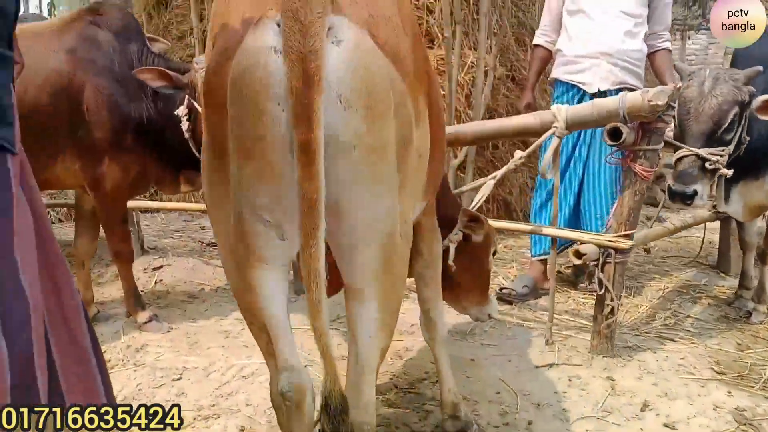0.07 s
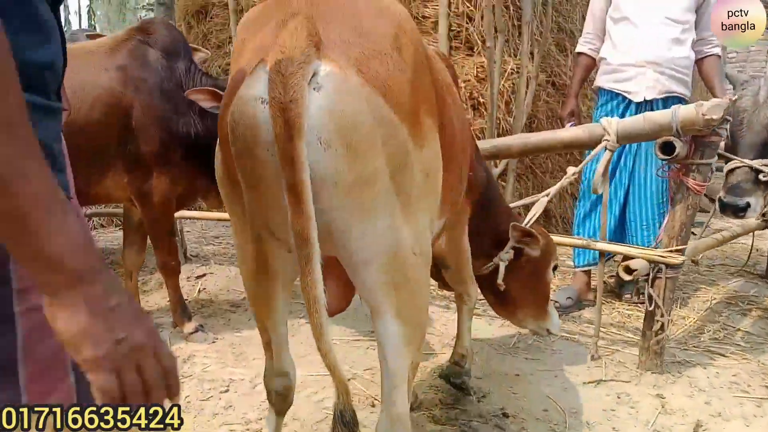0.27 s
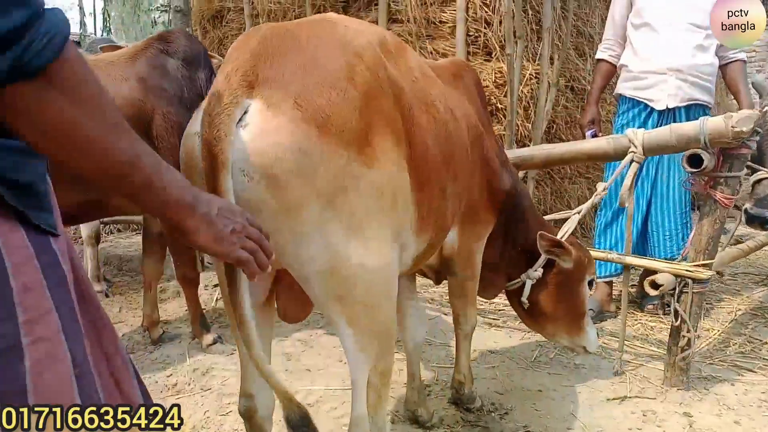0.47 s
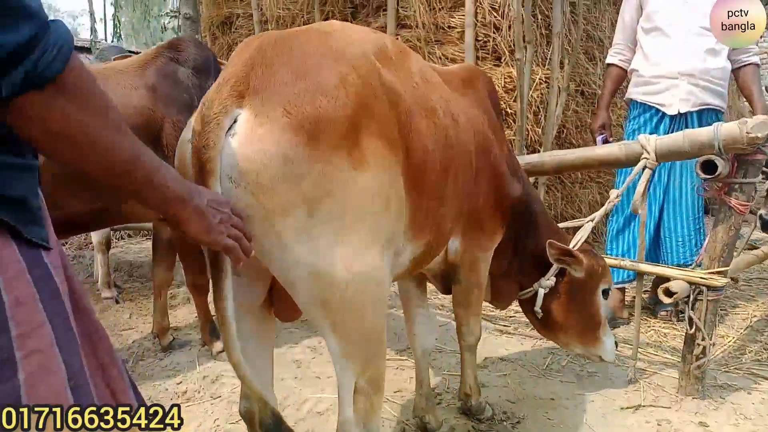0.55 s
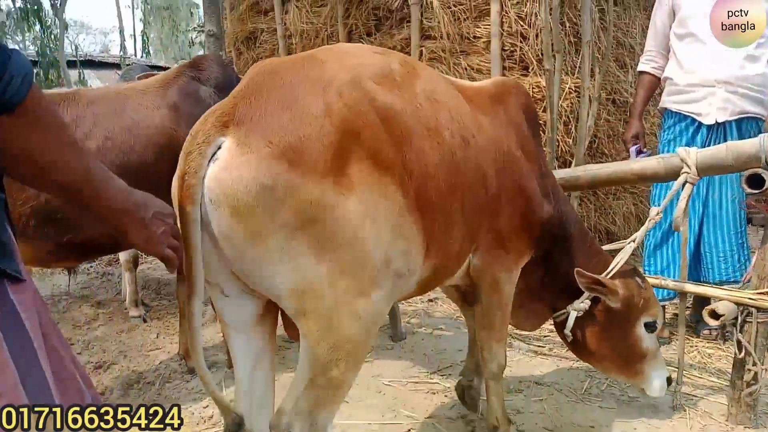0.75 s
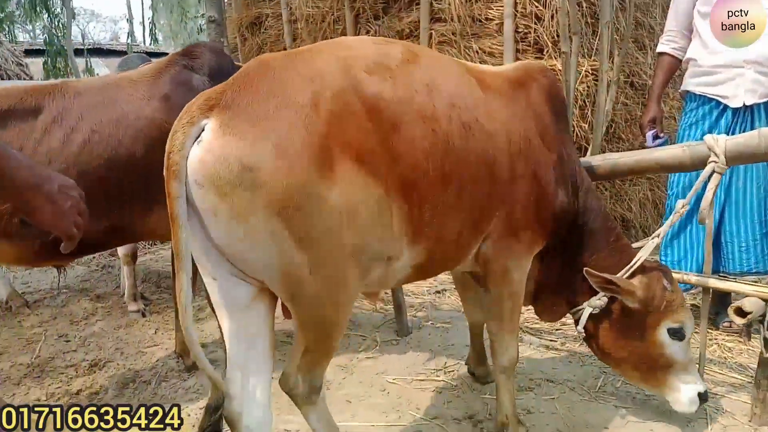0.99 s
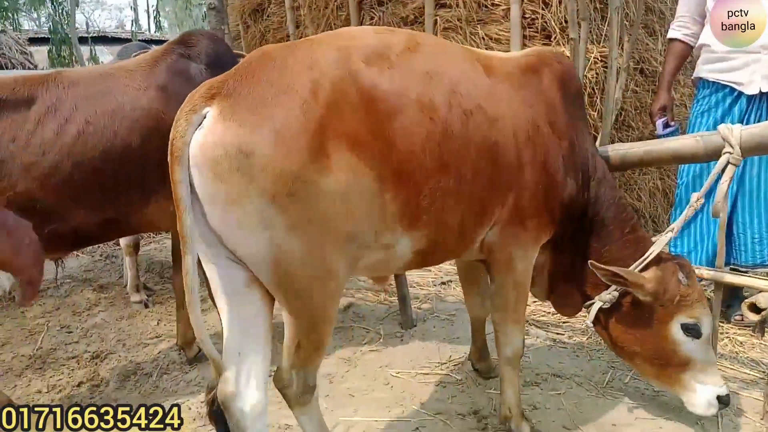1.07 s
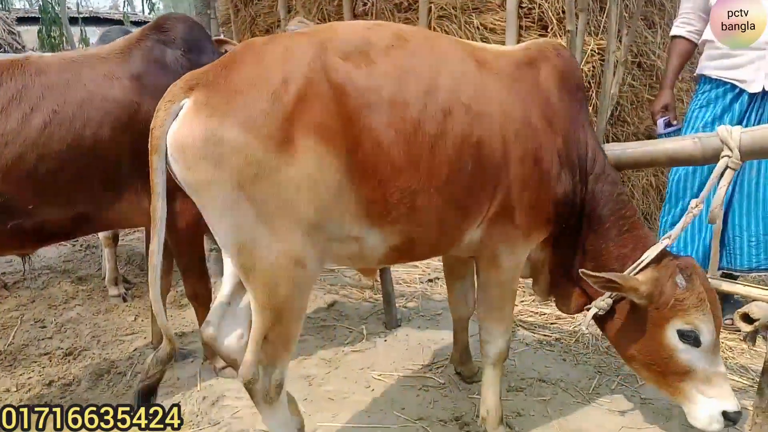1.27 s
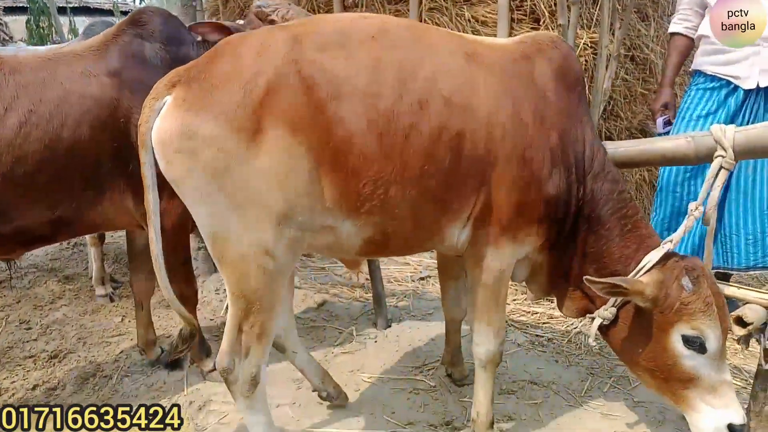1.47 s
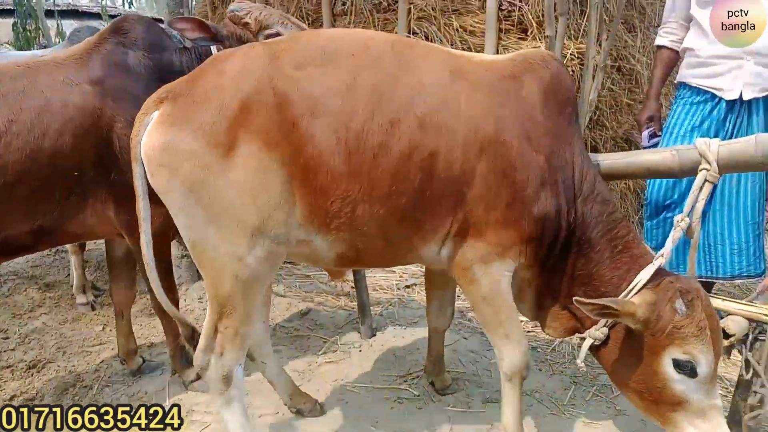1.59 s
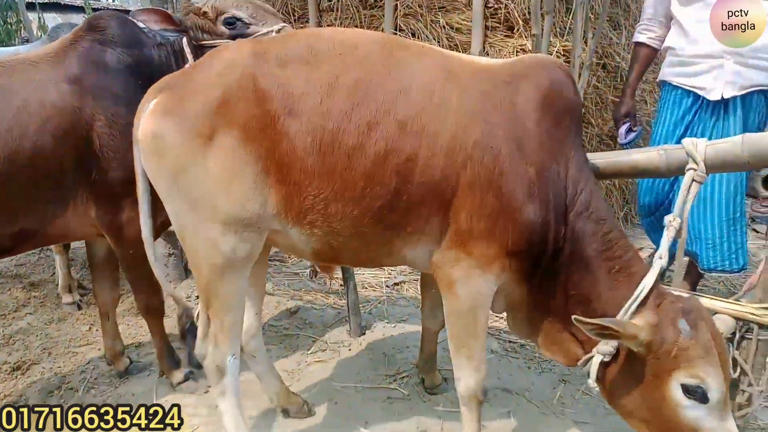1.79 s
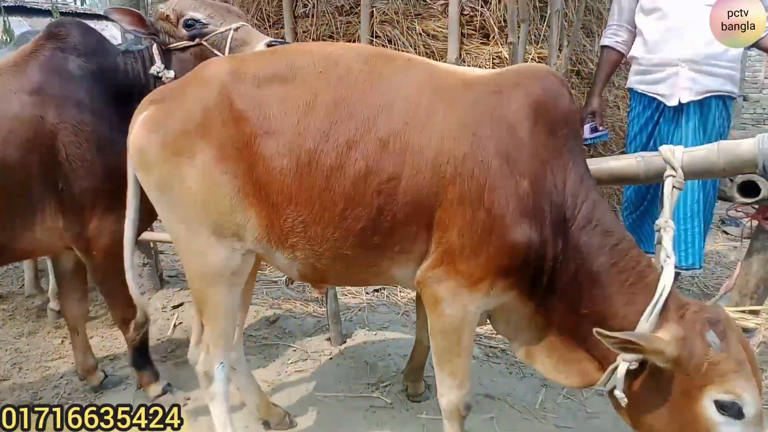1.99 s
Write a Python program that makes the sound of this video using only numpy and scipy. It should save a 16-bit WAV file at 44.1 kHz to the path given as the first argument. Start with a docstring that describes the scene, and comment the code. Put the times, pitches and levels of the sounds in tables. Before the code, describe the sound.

A bull gives a short low moo after crisp scuffing through sand and straw outdoors

```python
"""A bull grunts softly in an outdoor cattle yard, then feet scuff through sand and dry straw nearby.
Cattle further off give a thin, rattling call, and the bull answers the ear with a short low moo.
Straw snaps, small birds chirp faintly, and the microphone is very bright at the top.
Voices are pulses and breath ringing a throat, or plain low tones; sand, straw and air are shaped noise;
birds and a bamboo knock are sines. Near sounds are almost dry, far ones carry more of the yard."""
import sys
import numpy as np
from scipy import signal
from scipy.fft import rfft, irfft
from scipy.io import wavfile
from scipy.ndimage import uniform_filter1d

SR = 44100
rng = np.random.default_rng(int(sys.argv[2]) if len(sys.argv) > 2 else 0)


def master(y):
    """Save y as 16-bit WAV."""
    cut = np.clip(np.atleast_2d(y).T, -1, 1)
    pcm = np.round(cut * 32767)  # scale
    wavfile.write(sys.argv[1], SR, pcm.astype(np.int16))


N = 90404
T = np.arange(N) / SR  # time [s]

# spectrum of snapping straw: (frequency [Hz], relative level [dB])
SNAP_SPECTRUM = [(100, -57), (700, -44), (2000, -15), (5000, -16.5), (6500, -7), (8300, -26), (11000, -9.5),
                 (13500, 8), (15200, 13), (16000, -3), (17000, -79)]
SNAP_DECAY_S = .0011


def amp(db):
    """Decibels to gain."""
    return 10 ** (np.asarray(db) / 20)


def unit(x):
    """Scales to rms 1."""
    return x / np.sqrt(np.mean(x ** 2) + 1e-20)


def colour(x, points):
    """Filters by a spectrum of (frequency [Hz], level [dB]) points, joined along log frequency."""
    hz, db = np.transpose(points)
    padded = 2 * len(x)
    f = np.fft.rfftfreq(padded, 1 / SR)
    gain = amp(np.interp(np.log(f + 1), np.log(hz + 1), db))
    return irfft(rfft(x, padded) * gain)[:len(x)]


def wander(size):
    """Smooth random curve of rms 1; size [samples] sets how slowly it moves."""
    once = uniform_filter1d(rng.standard_normal(N), size)
    return unit(uniform_filter1d(once, size))


def level(s, db):
    """Gain along a dB curve, silent outside it, with its steps smoothed."""
    inside = (T >= s[0]) * (T <= s[-1])
    return uniform_filter1d(amp(np.interp(T, s, db)) * inside, size=200)


def phase(hz):
    """Running phase [rad] of a pitch curve [Hz]."""
    return 2 * np.pi * np.cumsum(hz) / SR


def bump(middle, half):
    """Bell-shaped swell, down to 1/e at half [s] from its middle [s]."""
    return np.exp(-((T - middle) / half) ** 2)


def resonate(x, hz, width):
    """A steep resonance that follows a pitch curve: shift to 0 Hz, low-pass twice, shift back."""
    turn = np.exp(1j * phase(hz * np.ones(N)))
    r = np.exp(-np.pi * width / SR)
    smooth = signal.lfilter([(1 - r) ** 2], [1, -2 * r, r * r], x / turn + 1e-18)
    return (turn * smooth).real


def ring(x, modes, factor=1):
    """Sums parallel resonances (frequency [Hz], width [Hz], level [dB]), pitched by a factor."""
    return unit(sum(amp(db) * unit(resonate(x, hz * factor, width)) for hz, width, db in modes))


def voice(turns, throat, rough, mouth=1):
    """Fold pulses and a puff of air in each cycle ring the throat."""
    folds = np.diff(np.floor(turns), prepend=0)
    puffs = np.exp(-2 * (turns % 1)) * rng.standard_normal(N)
    drive = (1 - rough) * unit(folds) + rough * unit(puffs)
    return ring(drive, throat, mouth)


def grit():
    """Dense grains of uneven size over a smooth hiss, in shifting patches of colour."""
    grains_per_s, spread_db, smooth_share, patchy_db = 3600, 2, 0.44, 1.2
    sizes = amp(spread_db * np.minimum(rng.exponential(1, N), 4)) * rng.choice([-1, 1], N)
    grains = unit(sizes * (rng.random(N) < grains_per_s / SR))
    mix = (1 - smooth_share) * grains + smooth_share * rng.standard_normal(N)
    z = signal.stft(mix, nperseg=512)[2]
    patches = uniform_filter1d(rng.standard_normal(z.shape), size=4, axis=0)  # across frequency
    patches = unit(uniform_filter1d(patches, size=12, axis=1))  # along time
    return signal.istft(z * amp(patchy_db * patches), nperseg=512)[1][:N]


def yard(x):
    """A short scatter from the ground, fence and straw stacks: sparse, decaying random echoes."""
    t60_s, first_echo_s = 0.22, .006
    t = T[:SR // 2]
    sparse = (rng.random(len(t)) < .05) * (t > first_echo_s)
    taps = rng.standard_normal(len(t)) * sparse * amp(-60 * t / t60_s)
    return signal.fftconvolve(x, taps / np.linalg.norm(taps))[:N]


def yard_air():
    """Smooth noise of the open yard, shaped by a spectrum and a slow level curve."""
    air_db = -49
    # spectrum of the air: (frequency [Hz], relative level [dB])
    air_spectrum = [(15, -53), (25, -25), (43, -22), (98, -18), (203, -22.5), (252, -29.5), (304, -26),
                    (967, -28), (1790, -22.5), (2220, -19.5), (4850, -24.5), (6180, -17), (8080, -31),
                    (8760, -31.5), (11800, -12.5), (13500, -14), (15400, 3.5)]
    # course of the air: (time [s], level relative to air_db [dB])
    air_curve = [(0, 1), (.2, 4), (.7, 5), (2.001, 4), (2.06, -1)]
    air = unit(colour(rng.standard_normal(N), air_spectrum))
    return amp(air_db) * level(*np.transpose(air_curve)) * air


def cloth():
    """The hiss of cloth sliding early on: fine grit through a bright spectrum."""
    # course of the slide: (time [s], level [dB])
    cloth_curve = [(0, -59.5), (.08, -63.5), (.17, -61.5), (0.217, -57), (0.229, -44.5), (0.271, -45.5),
                   (.33, -47.5), (0.449, -45)]
    # spectrum of the cloth: (frequency [Hz], relative level [dB])
    cloth_spectrum = [(100, -50), (1200, -31), (2000, -17.5), (5000, -10.5), (6200, 4), (7300, 0.5),
                      (8300, -7.5), (12000, -6.5), (16000, -17)]
    return level(*np.transpose(cloth_curve)) * unit(colour(grit(), cloth_spectrum))


def birds():
    """Short, wavering, nearly pure glides."""
    waver = .012  # share of the pitch
    # chirps: (middle [s], half length [s], pitch at the middle [Hz], glide [Hz/s], level [dB])
    chirps = [(0.038, 0.053, 3820, -7000, -73), (1.068, 0.019, 4360, -4000, -71.5),
              (1.282, 0.018, 3250, 495.5, -63), (1.44, 0.0054, 2970, -3000, -66),
              (1.482, 0.032, 2648, -1200, -66.5), (1.543, 0.011, 2244, -3.5, -60),
              (1.716, 0.03, 2774, -2000, -66), (1.883, 0.004, 2740, -12, -65.5),
              (2.048, .014, 4090, 1000, -65.5)]
    out = np.zeros(N)
    for s, half, hz, glide, db in chirps:
        pitch = (hz + glide * (T - s)) * (1 + waver * wander(size=100))
        out += amp(db) * bump(s, half) * np.sqrt(2) * np.sin(phase(pitch))
    return out


def knock():
    """A bamboo rail is bumped softly and its modes ring briefly."""
    start_s, rise_s, knock_db = 1.16, 0.0016, -61
    # modes of the bamboo: (frequency [Hz], level relative to knock_db [dB], t60 [s])
    modes = [(706, 2, 0.039), (988, -1, 0.094), (1250, 1.5, 0.045), (2090, -1.5, .04)]
    t = np.maximum(T - start_s, 0)
    tones = sum(amp(knock_db + db - 60 * t / t60) * np.sin(2 * np.pi * hz * t) for hz, db, t60 in modes)
    return np.minimum(t / rise_s, 1) * tones


def far_call():
    """Uneven rattling pulses through a nasal throat, with a weak chest tone and a thin falling line."""
    rough, jitter, chest_db = 0.24, .09, -16  # breath share, pitch share, level relative to the call
    # the call: (time [s], pulse rate [Hz], level [dB], mouth opening [factor on the resonances])
    call_curve = [(1.179, 79.7, -76, 1), (1.23, 92.25, -61, 0.99), (1.279, 100, -59.5, 0.97),
                  (1.33, 72.2, -59.5, 1), (1.398, 75.26, -60, 1.0), (1.469, 71.34, -63, 0.96),
                  (1.508, 67.5, -86.5, 0.82), (1.54, 71.6, -105, .95)]
    # the far throat: (frequency [Hz], width [Hz], relative level [dB])
    throat = [(907, 116, -14), (1636, 110, -2.5), (1853, 50, 2), (1946, 43, -1.5)]
    # the thin clear line: (time [s], pitch [Hz], level [dB])
    line_curve = [(1.241, 955.5, -71.5), (1.301, 935, -88.5), (1.361, 907.4, -81), (1.401, 854, -77),
                  (1.441, 807, -68), (1.474, 750, -76.5), (1.495, 760, -87)]
    s, hz, db, mouth = np.transpose(call_curve)
    turns = np.cumsum(np.interp(T, s, hz) * (1 + jitter * wander(size=250))) / SR
    chest = np.sin(2 * np.pi * turns) + .5 * np.sin(4 * np.pi * turns)
    nasal = voice(turns, throat, rough, np.interp(T, s, mouth))
    rattle = (nasal + amp(chest_db) * chest) * level(s, db)
    s, hz, db = np.transpose(line_curve)
    line = unit(np.sin(phase(np.interp(T, s, hz))))
    return rattle + level(s, db) * line


def rasp():
    """The far call turns hoarse where it is pushed hardest: a brief band of noise."""
    middle_s, half_s, rasp_db = 1.338, 0.012, -61.5
    band = unit(resonate(rng.standard_normal(N), hz=2610, width=570))
    return amp(rasp_db) * bump(middle_s, half_s) * band


def crackle():
    """Many tiny snaps in trodden straw: random ticks of uneven size, each a decaying noise burst."""
    ticks_per_s, spread_db = 320, 4
    # course of the crackle: (time [s], level [dB])
    crackle_curve = [(0.199, -53.5), (.35, -45.5), (.7, -57.5), (.8, -59), (1.3, -60), (1.8, -53.5),
                     (2.04, -72)]
    sizes = amp(spread_db * np.minimum(rng.exponential(1, N), 3))
    ticks = sizes * (rng.random(N) < ticks_per_s / SR)
    decay = np.exp(-1 / (SNAP_DECAY_S * SR))
    bursts = signal.lfilter([1], [1, -decay], ticks) * rng.standard_normal(N)
    return level(*np.transpose(crackle_curve)) * unit(colour(bursts, SNAP_SPECTRUM))


def snaps():
    """Dry stalks break in bursts about a millisecond long; thick ones ring lower."""
    rise_s = .0005
    # breaks: (time [s], peak level [dB], share of the thick stalk's ring [0-1])
    breaks = [(.268, -17, .7), (.2745, -26, .4), (.2845, -25, 0), (.315, -23, 0), (.581, -28, 0),
              (.6415, -24, 0), (.679, -30, 0), (.797, -36, 0), (.8625, -31, .1), (.927, -42, 0),
              (1.0165, -33, 0), (1.03, -38, 0), (1.072, -37, 0), (1.7685, -32, 0), (1.9335, -35, 0),
              (1.985, -30, 0), (2.0168, -36, 0)]
    # ring of a thick stalk: (frequency [Hz], relative level [dB])
    stalk_spectrum = [(100, -76), (4000, -31), (7500, -15), (9000, -11), (11000, 0.5), (12500, -4),
                      (16000, -20), (17000, -46)]
    out, t = np.zeros(N), T[:1024]
    for s, db, share in breaks:
        crack = rng.standard_normal(len(t)) * np.minimum(t / rise_s, 1) * np.exp(-t / SNAP_DECAY_S)
        thin, thick = unit(colour(crack, SNAP_SPECTRUM)), unit(colour(crack, stalk_spectrum))
        burst = (1 - share) * thin + share * thick
        part = out[round(s * SR):][:len(t)]  # a view, cut at the end of the scene
        part += (amp(db) * burst / abs(burst).max())[:len(part)]
    return out


def crunches():
    """Weight presses grit into the ground, whose resonances color the grains."""
    half_s = 0.028
    # presses: (time [s], level [dB])
    presses = [(0.386, -72), (0.476, -65.5), (0.658, -65.5)]
    # resonances of the ground: (frequency [Hz], width [Hz], relative level [dB])
    ground = [(850, 130, 3.5), (1100, 120, 7)]
    return ring(grit(), ground) * sum(amp(db) * bump(s, half_s) for s, db in presses)


def scuffs():
    """Each scuff swells and fades, with a sandy fizz above a lower, partly hollow scrape."""
    clump_db, hollow_db, hollow_drift = 1.51, -1, 0.046  # drift is a share of the frequency
    # scuffs: (peak [s], rise [s], fall [s], sand fizz level [dB], scrape level [dB])
    strokes = [(.275, 0.029, 0.06, -33, -59.5), (0.352, 0.06, 0.054, -27.5, -47),
               (.405, 0.062, 0.041, -26.5, -42), (.48, 0.077, 0.15, -33, -49.5),
               (0.602, 0.026, 0.033, -32.5, -54), (0.644, 0.041, 0.03, -33, -48.5),
               (.685, 0.037, 0.026, -39, -50.5), (0.829, 0.11, 0.081, -50, -67),
               (1.05, 0.045, 0.074, -54, -68.5), (1.352, 0.044, 0.03, -43, -58.5),
               (1.498, 0.025, 0.037, -41, -62), (1.62, 0.056, 0.039, -46.5, -73),
               (1.73, .025, 0.037, -40, -67), (1.782, .025, 0.032, -35, -54.5),
               (1.88, 0.14, 0.026, -47, -68.5)]
    # spectra of fizz and scrape: (frequency [Hz], relative level [dB])
    fizz_spectrum = [(1000, -76), (5000, -54), (8500, -36.5), (10000, -29), (12000, -15), (13700, -14.5),
                     (14500, -3), (15000, -5), (15500, -5.5)]
    scrape_spectrum = [(300, -56), (600, -33), (950, -25), (1400, -17.5), (2100, -5.5), (3000, -7),
                       (4000, 0), (5000, 0), (6200, 5), (7000, 4.5), (7800, -22), (11000, -24),
                       (16000, -38)]
    # hollow resonances of the scrape: (frequency [Hz], width [Hz], relative level [dB])
    hollows = [(1075, 188, -13.5), (1865, 200, -5.5), (2344, 210, -0.5), (3422, 260, 1.5), (4450, 510, -2),
               (6260, 500, 10)]
    fizz_power, scrape_power = np.zeros((2, N))
    for peak, rise, fall, fizz_db, scrape_db in strokes:
        power = bump(peak, np.where(T < peak, rise, fall)) ** 2
        fizz_power += power * amp(fizz_db) ** 2
        scrape_power += power * amp(scrape_db) ** 2
    clumps = amp(clump_db * wander(size=220))
    drive = grit()
    hollow = 0
    for hz, width, db in hollows:
        drifting_hz = hz * (1 + hollow_drift * wander(size=2000))
        hollow = hollow + amp(db) * unit(resonate(drive, drifting_hz, width))
    fizz = unit(colour(clumps * grit(), fizz_spectrum))
    scrape = unit(colour(clumps * grit(), scrape_spectrum))
    scrape = unit(scrape + amp(hollow_db) * unit(hollow))
    return np.sqrt(fizz_power) * fizz + np.sqrt(scrape_power) * scrape


def grunts():
    """Low tones with the bull's mouth shut, sagging in pitch and fading."""
    rise_s, fade_db, sag = 0.0048, -5.5, 0.068  # fade and sag (share of pitch) over the length
    # grunts: (start [s], length [s], starting pitch [Hz], starting level [dB])
    shut_grunts = [(0.016, 0.049, 66.6, -62.5), (0.077, 0.16, 71.3, -76), (1.475, 0.062, 92.77, -69.5)]
    out = np.zeros(N)
    for start, length, hz, db in shut_grunts:
        u = np.clip((T - start) / length, 0, 1)  # progress 0-1
        gate = np.minimum(np.minimum(u, 1 - u) * length / rise_s, 1)
        tone = np.sqrt(2) * np.sin(phase(hz * (1 - sag * u)))
        out += gate * amp(db + fade_db * u) * tone
    return out


def moo():
    """A round chest tone rises and sags; the mouth opens and closes over a rough buzz."""
    rough, jitter, shimmer = .3, .035, 0.24  # breath share, share of pitch, share of chest level
    chest_trim_db, overtone_db = -2, -18.5
    widest_s, closing_s, mouth_range = 1.86, 0.086, 0.042  # range is a share of the resonances
    # the moo: (time [s], pitch [Hz], chest level before the trim [dB], mouth level [dB])
    moo_curve = [(1.681, 88, -84, -80.5), (1.707, 82, -60, -78), (1.734, 89.7, -64.5, -69),
                 (1.761, 119.4, -51.5, -65), (1.793, 128.5, -63.5, -58), (1.825, 122.9, -52.5, -61.5),
                 (1.858, 121.6, -61, -58.5), (1.895, 117.9, -46.5, -62), (1.925, 96.26, -49, -65.5),
                 (1.945, 81.55, -47, -59.5), (1.974, 79, -47.5, -57.5), (1.997, 71.05, -53.5, -67),
                 (2.032, 63.15, -77, -75)]
    # the bull's throat: (frequency [Hz], width [Hz], relative level [dB])
    throat = [(414, 107, 1.5), (684, 180, -3), (894, 62, -12), (1753, 107, -5), (2240, 410, -12)]
    s, hz, chest_db, mouth_db = np.transpose(moo_curve)
    turns = np.cumsum(np.interp(T, s, hz) * (1 + jitter * wander(size=200))) / SR
    overtone = amp(overtone_db) * np.sin(4 * np.pi * turns)
    chest = unit(np.sin(2 * np.pi * turns) + overtone)
    chest = chest * (1 + shimmer * wander(size=300))
    mouth = 1 - mouth_range * (1 - bump(widest_s, closing_s))
    buzz = voice(turns, throat, rough, mouth)
    return chest * level(s, chest_db + chest_trim_db) + buzz * level(s, mouth_db)


def scene():
    """Near sounds are almost dry; far ones carry more of the yard."""
    near_yard_db, far_yard_db = -20.5, -3
    far = birds() + knock() + far_call() + rasp()
    near = crackle() + snaps() + crunches() + scuffs() + grunts() + moo()
    scatter = yard(amp(near_yard_db) * near + amp(far_yard_db) * far)
    return (yard_air() + cloth() + far + near + scatter)[None]


def record(dry):
    """The recorder's band limit: a steep low-pass."""
    edge_hz = 15490
    lowpass = signal.firwin(801, edge_hz, window=("kaiser", 8), fs=SR)
    return signal.oaconvolve(dry, lowpass[None], "same")


dry = scene()
out = record(dry)
master(out)
```